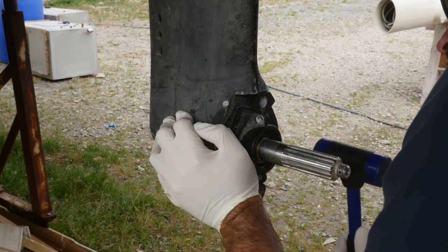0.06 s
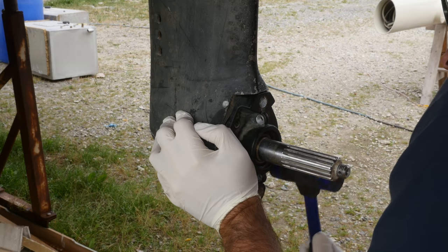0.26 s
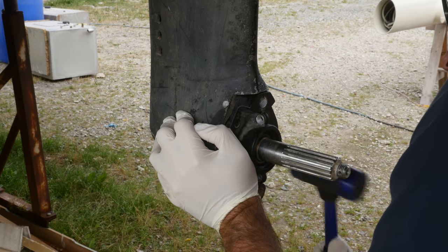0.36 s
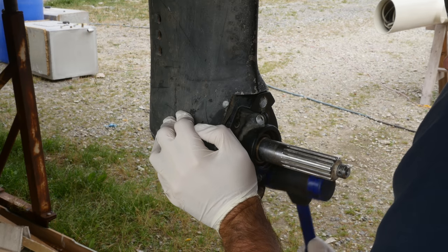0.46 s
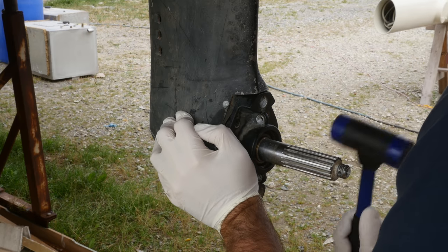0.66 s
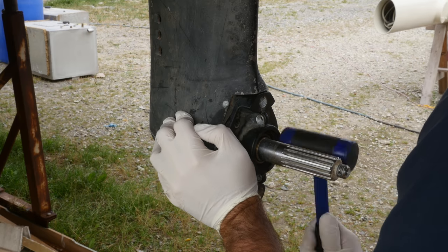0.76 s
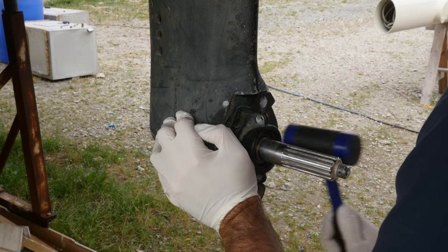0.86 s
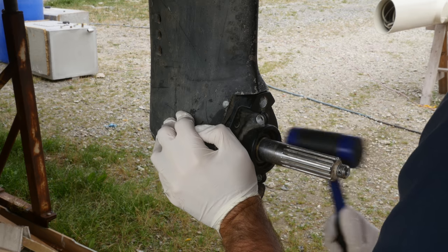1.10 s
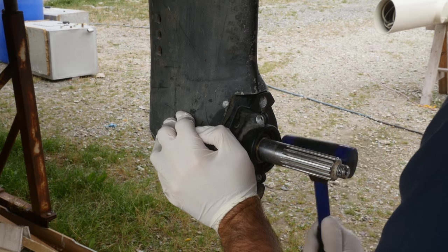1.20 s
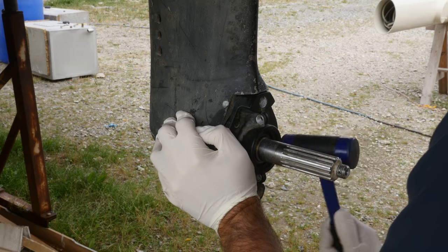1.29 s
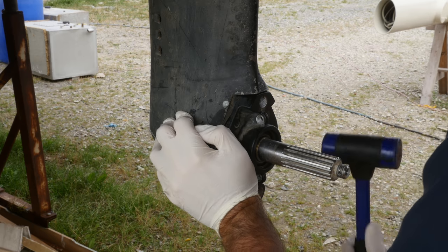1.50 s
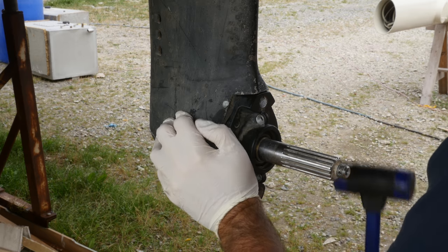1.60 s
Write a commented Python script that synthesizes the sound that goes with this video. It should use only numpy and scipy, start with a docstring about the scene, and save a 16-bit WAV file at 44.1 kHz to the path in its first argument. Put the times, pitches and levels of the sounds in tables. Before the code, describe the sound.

A soft-faced mallet knocks a metal housing at about 0.23, 0.43, 0.76, 1.0 and 1.2 seconds, a barely audible graze merging into the fourth blow. Each is a loud, sharp clack with a blunt midrange thud, brief casing ring and faint outdoor scatter, peaks rounded by overload. From 1.35, very soft sleeve rustle and tiny handling ticks, over low open air and faint wavering engine hum.

```python
"""Mallet on a bearing housing

A soft-faced mallet taps a metal housing home five times outdoors, with a faint graze before the fourth blow.
Each contact sums minimum-phase pulses: a metal clack and the dull push of the soft face.
Damped sine modes ring the hand-held casing and shaft; decaying noise and smeared echoes make the yard's answer.
Filtered noise gives sleeve rustle, ticks and open air; a wavering two-harmonic tone is a distant engine.
The recorder overloads on the blows, which rounds off their peaks."""
import sys
import numpy as np
from scipy import signal
from scipy.fft import rfft, irfft, next_fast_len
from scipy.io import wavfile

SR = 44100
rng = np.random.default_rng(int(sys.argv[2]) if len(sys.argv) > 2 else 0)


def to_wav(s):
    """Save 16-bit WAV."""
    ch = np.atleast_2d(s).T  # columns
    pcm = np.round(np.clip(ch, -1, 1) * 32767)  # PCM
    wavfile.write(sys.argv[1], SR, pcm.astype(np.int16))


N = 72765
T = np.arange(SR // 2) / SR  # time axis of one sound, s
HZ = np.fft.rfftfreq(len(T), 1 / SR)

# Mallet blows, one per row; the faint one is a graze just ahead of a full blow. Levels are relative:
# start_s, strength_db, clack_db, clack_pitch_hz, clack_tilt_db_per_octave (above the pitch),
# upper_modes_db, shaft_db
MALLET_BLOWS = [(.2291, -0.5, -3, 3430, -1, 5, 0), (0.4343, -1.37, -3, 4130, -2.5, 0.5, -5),
                (0.7596, -1.5, -4, 2970, 2, -1.5, -7), (0.9934, -30, -2, 4250, -4, -6, -13),
                (.9967, -1, -1, 4080, -0.5, 3.5, -18), (1.1993, -1.5, -0.5, 5080, 3, -0.5, -3)]


def mallet():
    """Superposition: each blow sums contact, reflections, casing and shaft modes, and the yard's response."""
    out = np.zeros(N)
    weak = partials(count=50)
    for start_s, strength_db, clack_db, clack_hz, tilt_db, upper_db, shaft_db in MALLET_BLOWS:
        knock = contact(clack_db, clack_hz, tilt_db)
        direct = knock + reflected(knock)
        ringing = casing(weak, upper_db) + shaft(shaft_db)
        add(out, start_s, amp(strength_db) * (direct + ringing + yard()))
    return out


# Spectrum of the soft face's push: frequency_hz, relative_level_db
PUSH_SPECTRUM = [(60, -44), (200, -7), (450, 1), (750, 5), (1100, -1.5), (1450, -0.5), (1900, -12),
                 (3000, -34.5), (8000, -49.5)]
# Spectrum of the housing clacking in its seat: frequency_hz, relative_level_db
CLACK_SPECTRUM = [(500, -25), (1500, 1), (2200, -3.5), (3000, 0.5), (4200, 0.5), (6000, -10.5), (8800, -10),
                  (11500, -19.5), (16000, -21)]
PUSH_DB, PUSH_LAG_S = 14, 0.00014
CLACK_DB, CLACK_T60_S = 5, 0.0031
CLACK_PEAK_DB, CLACK_PEAK_OCTAVES = 6.5, 0.09
CLACK_GRIT = 0.35  # norm of the grit, against a first impulse of 1


def contact(clack_db, clack_hz, tilt_db):
    """Impact excitation: a gritty metal clack, then at once a soft push of opposite sign."""
    away = octaves(HZ, clack_hz)
    tilt = tilt_db * np.maximum(away, 0)
    peak = CLACK_PEAK_DB * np.exp(-0.5 * (away / CLACK_PEAK_OCTAVES) ** 2)
    clack_pulse = pulse(along(CLACK_SPECTRUM, HZ) + tilt + peak)

    grit = rng.standard_normal(len(T)) * T * fade(CLACK_T60_S)
    grit *= CLACK_GRIT / np.linalg.norm(grit)
    grit[0] = 1  # the main impulse
    clack = signal.fftconvolve(clack_pulse, grit)[:len(T)]

    push = np.interp(T - PUSH_LAG_S, T, pulse(along(PUSH_SPECTRUM, HZ)), left=0)
    return amp(CLACK_DB + clack_db) * clack - amp(PUSH_DB) * push


# First reflections from the ground and the worker: delay_s, level_db
FIRST_REFLECTIONS = [(.0067, -23.5), (.0095, -31), (0.0179, -36)]
REFLECTION_HZ = 3440  # low-pass cutoff


def reflected(sound):
    """Specular reflection with treble absorption: dull, delayed copies of a contact."""
    dull = signal.sosfilt(signal.butter(1, REFLECTION_HZ, fs=SR, output="sos"), sound)
    return sum(amp(db) * np.interp(T - delay, T, dull, left=0) for delay, db in FIRST_REFLECTIONS)


# Strong modes of the casing: nominal_pitch_hz, nominal_level_db, t60_s
CASING_MODES = [(114.5, -33.5, 0.2), (148, -25, 0.058), (331.6, -33.5, 0.11), (435, -35.5, 0.1),
                (522.4, -23, 0.031), (606, -35.5, 0.12), (741.3, -21.5, 0.064), (1430, -47, 0.14),
                (2000, -50.5, 0.14), (2440, -37, 0.044), (2794, -29.5, 0.026), (3990, -42.5, 0.071),
                (5270, -58.5, 0.066), (6380, -44.5, 0.044)]


def casing(weak, upper_db):
    """Modal superposition: strong modes share the push's sign; weak partials start at random phase."""
    strong_ring = ring(CASING_MODES, upper_db, np.full(len(CASING_MODES), -np.pi / 2))
    weak_ring = ring(weak, upper_db, rng.uniform(0, 2 * np.pi, len(weak)))
    return strong_ring + weak_ring


# Envelope of the casing's many weak, quickly damped partials: frequency_hz, relative_level_db
PARTIAL_SPECTRUM = [(850, 1), (1400, -5.5), (2000, -5.5), (2800, -11.5), (4000, -10), (5200, -21.5),
                    (7500, -30)]
PARTIALS_DB = -47
PARTIALS_T60_S, PARTIALS_T60_SPREAD = 0.095, 0.15  # median and log-normal spread


def partials(count):
    """Modal density: scattered weak partials as rows (Hz, dB, t60 s), the same set for every blow."""
    place, damping = rng.standard_normal((2, count))
    lowest, highest = PARTIAL_SPECTRUM[0][0], PARTIAL_SPECTRUM[-1][0]
    hz = np.linspace(lowest ** 0.5, highest ** 0.5, count) ** 2
    hz += np.gradient(hz) * place / 2
    level_db = PARTIALS_DB + along(PARTIAL_SPECTRUM, hz)
    t60 = PARTIALS_T60_S * np.exp(PARTIALS_T60_SPREAD * damping)
    return np.column_stack([hz, level_db, t60])


# The shaft's thin lingering modes: nominal_pitch_hz, nominal_level_db, t60_s
SHAFT_MODES = [(2485, -64, .45), (2550, -64, .55), (3950, -66, .5)]


def shaft(shaft_db):
    """Light damping: a few shaft modes linger as a thin ring."""
    return amp(shaft_db) * ring(SHAFT_MODES, 0, np.zeros(len(SHAFT_MODES)))


UPPER_HZ = 1800
MODE_SCATTER_DB, MODE_DETUNE = 0.5, 0.004  # standard deviations; detune is a fraction of the pitch
RING_RISE_S = 0.0016


def ring(modes, upper_db, phase):
    """Damped free vibration: decaying sines, each a little different at each blow."""
    out = np.zeros(len(T))
    scatter = rng.standard_normal((len(modes), 2))
    for (hz, db, t60), start, (louder, sharper) in zip(modes, phase, scatter):
        gain = amp(db + MODE_SCATTER_DB * louder + upper_db * (hz > UPPER_HZ))
        t = T[:int(1.5 * t60 * SR)]  # stop once 90 dB down
        pitch = hz * (1 + MODE_DETUNE * sharper)
        decay = np.exp(-np.log(1000) * t / t60)
        out[:len(t)] += gain * decay * np.sin(2 * np.pi * pitch * t + start)
    return out * (1 - np.exp(-T / RING_RISE_S))


# Early scatter from the ground and nearby gear: frequency_hz, relative_level_db
NEAR_SPECTRUM = [(100, -8), (250, -0.5), (500, 3), (800, -1.5), (1400, 4.5), (2000, -7), (2800, -5.5),
                 (4000, -8), (6000, -15), (8500, -18), (11000, -26), (16000, -31)]
# Decay of that early scatter: frequency_hz, t60_s
NEAR_DECAY = [(300, 0.16), (1200, 0.061), (4000, 0.062), (12000, 0.064)]
# Diffuse scatter from the yard: frequency_hz, relative_level_db
YARD_SPECTRUM = [(60, -17), (130, 6.5), (260, -4), (700, 8.5), (1000, -11), (2000, -25), (4000, -28),
                 (7000, -35.5), (15000, -53)]
# Decay of the yard's scatter: frequency_hz, t60_s
YARD_DECAY = [(130, 0.62), (700, 0.29), (2000, 0.74), (4000, 0.62), (10000, 0.14)]
# Echoes from hulls and sheds: delay_s, level_db, smear_s, strongest_hz
YARD_ECHOES = [(.088, -60, .003, 1400), (0.088, -71, 0.0053, 3800), (0.144, -62, .007, 1480),
               (0.176, -74.5, .004, 4000)]
NEAR_DB = -30.5
YARD_DB, YARD_RISE_S = -41, 0.0044
ECHO_SLOPE_DB = 15  # fall per octave either side of the strongest frequency


def yard():
    """Diffuse scattering: noise with frequency-dependent decay, plus a few smeared echoes of one blow."""
    answer = amp(NEAR_DB) * dying(NEAR_SPECTRUM, NEAR_DECAY) * (1 - np.exp(-T / RING_RISE_S))
    answer += amp(YARD_DB) * dying(YARD_SPECTRUM, YARD_DECAY) * (1 - np.exp(-T / YARD_RISE_S))
    for delay, db, smear, hz in YARD_ECHOES:
        colour = np.column_stack([HZ, -ECHO_SLOPE_DB * np.abs(octaves(HZ, hz))])
        envelope = np.exp(-0.5 * ((T - delay) / smear) ** 2)
        answer += amp(db) * envelope * noise(colour, len(T))
    return answer


# Loudness of the sleeve and glove: time_s, level_db
SLEEVE_LEVEL = [(0, -100), (1.2, -107), (1.35, -70.5), (1.45, -66.5), (1.55, -68.5), (1.65, -67)]
# Spectrum of the rubbing cloth: frequency_hz, relative_level_db
CLOTH_SPECTRUM = [(200, 8), (1200, 3.5), (2800, -10.5), (5000, -2.5), (7000, -15), (9000, -16.5),
                  (15000, -43)]


def sleeve():
    """Friction noise: cloth rustles as the mallet is drawn back."""
    return amp(curves(SLEEVE_LEVEL)[0]) * noise(CLOTH_SPECTRUM, N)


# Small handling ticks: start_s, level_db, pitch_hz
HANDLING_TICKS = [(1.376, -70, 7800), (1.589, -58.5, 2410), (1.606, -58, 6940)]
TICK_T60_S, TICK_OCTAVES = 0.0098, 0.63


def ticks():
    """Impulsive noise: the grip ticks faintly in short, banded, decaying bursts."""
    out = np.zeros(N)
    for start_s, db, hz in HANDLING_TICKS:
        below = hz / 2 ** (2 * TICK_OCTAVES)
        above = hz * 2 ** (4 * TICK_OCTAVES)
        colour = [(below, -18), (hz, 0), (above, -32)]
        add(out, start_s, amp(db) * fade(TICK_T60_S) * noise(colour, len(T)))
    return out


# Distant engine, whose hum wavers: time_s, pitch_hz, relative_level_db
ENGINE_HUM = [(0.0, 64.8, -55), (0.128, 65.7, -50), (0.432, 60.93, -47), (0.666, 66.84, -59),
              (0.79, 65, -65), (0.812, 70.2, -58), (0.982, 66.75, -51), (1.506, 68.35, -47),
              (1.65, 66.2, -51.5)]
ENGINE_DB, SECOND_DB = -4, -19.5  # overall trim; second harmonic against the first


def engine():
    """Harmonic tone: a wavering fundamental and its second harmonic, from integrated frequency."""
    hz, db = curves(ENGINE_HUM)
    phase = 2 * np.pi * np.cumsum(hz) / SR
    tone = np.sin(phase) + amp(SECOND_DB) * np.sin(2 * phase)
    return np.sqrt(2) * amp(db + ENGINE_DB) * tone


# Spectrum of the open air: frequency_hz, relative_level_db
AIR_SPECTRUM = [(25, 6), (60, 1.5), (130, 2), (280, -10), (600, -9.5), (950, -15.5), (1400, -19.5),
                (2500, -29), (5000, -37), (9000, -39.5), (15000, -42.5)]
AIR_DB = -61.5


def open_air():
    """Stationary broadband noise: steady, with its energy mostly at low frequencies."""
    return amp(AIR_DB) * noise(AIR_SPECTRUM, N)


def amp(db):
    """Logarithmic level: decibels to amplitude gain."""
    return 10 ** (np.asarray(db) / 20)


def unit(x):
    """Root-mean-square normalisation: scale to rms 1."""
    return x / np.sqrt(np.mean(x ** 2) + 1e-20)


def octaves(hz, centre_hz):
    """Logarithmic pitch: distance from a centre frequency in octaves."""
    return np.log2((hz + 1) / centre_hz)


def along(points, hz):
    """Logarithmic frequency: (Hz, value) points interpolated on a log axis."""
    f, v = np.transpose(points)
    return np.interp(np.log(hz + 1), np.log(f + 1), v)


def curves(rows):
    """Linear interpolation: one value per sample for each column after the time."""
    s, *cols = np.transpose(rows)
    return [np.interp(np.arange(N) / SR, s, c) for c in cols]


def fade(t60):
    """Exponential decay: 60 dB in t60 seconds."""
    return amp(-60 * T / t60)


def add(track, s, sound):
    """Linear superposition: mix a sound in at time s."""
    i = round(s * SR)
    track[i:i + len(sound)] += sound[:N - i]


def noise(colour, size):
    """Spectral shaping: white noise filtered to a colour and scaled to rms 1."""
    gain = amp(along(colour, np.fft.rfftfreq(size, 1 / SR)))
    white = rng.standard_normal(size)
    return unit(irfft(rfft(white) * gain, size))


def pulse(db):
    """Minimum phase: the most compact causal pulse with this level at each frequency."""
    n = len(T)
    cepstrum = irfft(np.log(amp(db)), n)
    cepstrum[1:n // 2] *= 2  # fold onto positive time
    cepstrum[n // 2 + 1:] = 0
    return irfft(np.exp(rfft(cepstrum)), n)


def dying(colour, t60s):
    """Frequency-dependent damping: noise whose bands each decay at their own rate."""
    hz, t, bands = signal.stft(noise(colour, len(T)), SR, nperseg=256)
    decay = amp(-60 * t / along(t60s, hz)[:, None])
    return signal.istft(bands * decay, SR, nperseg=256)[1][:len(T)]


def scene():
    """Superposition: all sources sum at one microphone."""
    return (mallet() + sleeve() + ticks() + engine() + open_air())[None]


# The microphone's treble response: frequency_hz, level_db
MICROPHONE_RESPONSE = [(11000, -0.5), (14500, -1.5), (16500, -14)]
CLIP_LEVEL, CLIP_HARDNESS = 0.29, 7  # ceiling, and sharpness of the bend
LOW_CUT_HZ, TOP_HZ = 70, 16500


def record(dry):
    """Saturation and band limiting: round off peaks, cut rumble, soften treble, limit the band."""
    clipped = dry / (1.5 + np.abs(dry / CLIP_LEVEL) ** CLIP_HARDNESS) ** (1 / CLIP_HARDNESS)
    clipped = signal.sosfilt(signal.butter(2, LOW_CUT_HZ, "high", fs=SR, output="sos"), clipped)
    m = next_fast_len(N + SR // 2)
    hz = np.fft.rfftfreq(m, 1 / SR)
    low_pass = 1 / (1 + (hz / TOP_HZ) ** 120)
    response = amp(along(MICROPHONE_RESPONSE, hz)) * low_pass
    return irfft(rfft(clipped, m) * response, m)[..., :N]


dry = scene()
out = record(dry)
to_wav(out)
```